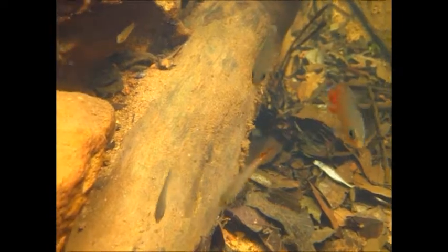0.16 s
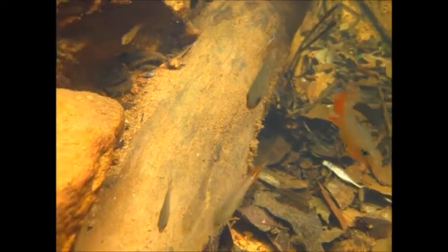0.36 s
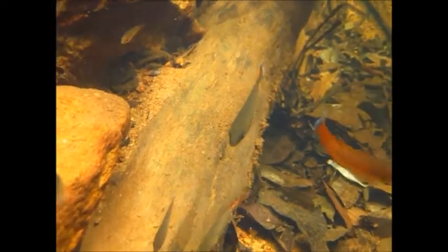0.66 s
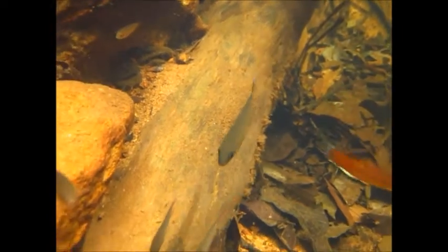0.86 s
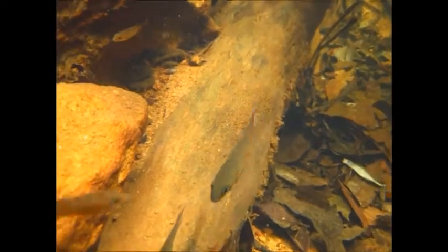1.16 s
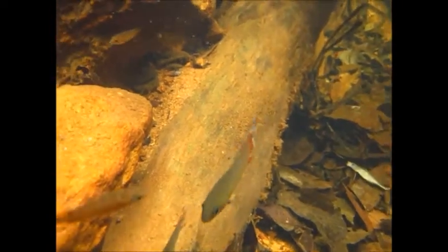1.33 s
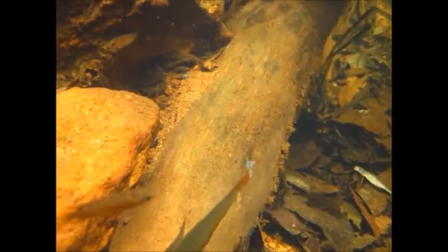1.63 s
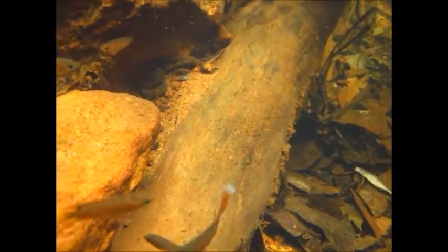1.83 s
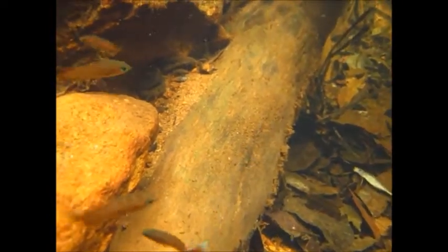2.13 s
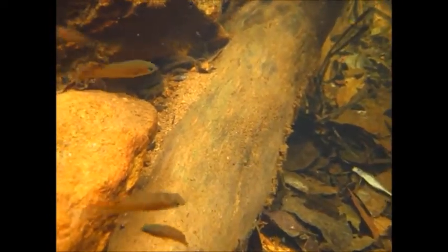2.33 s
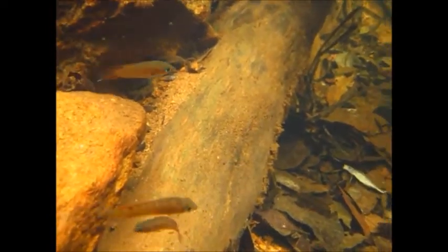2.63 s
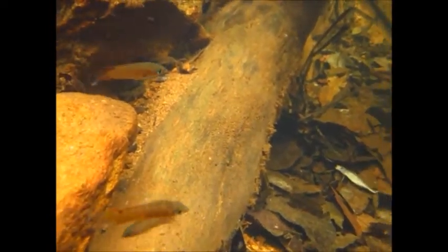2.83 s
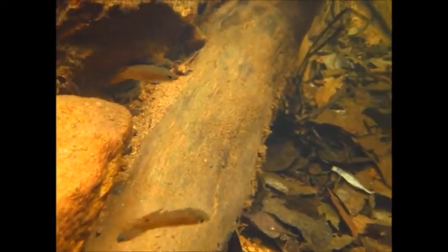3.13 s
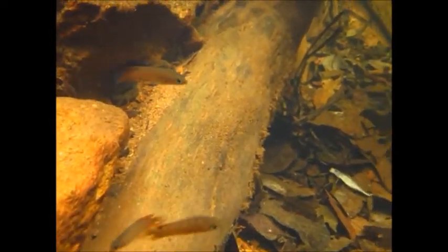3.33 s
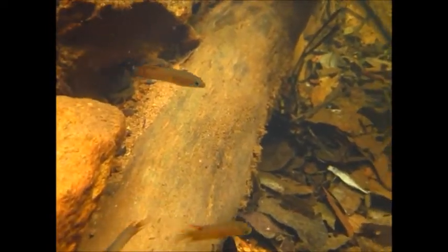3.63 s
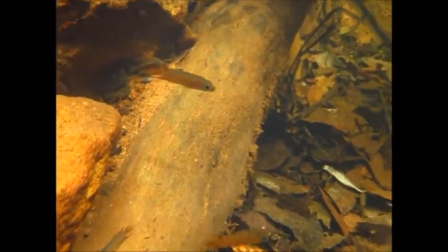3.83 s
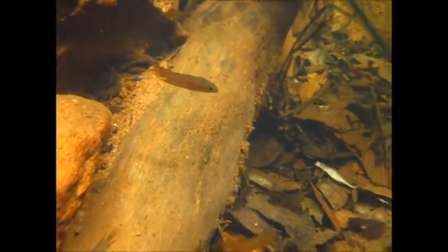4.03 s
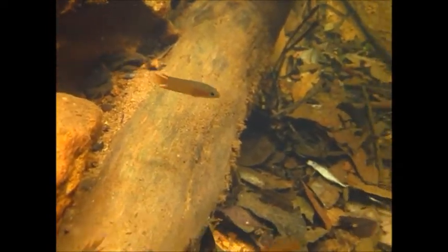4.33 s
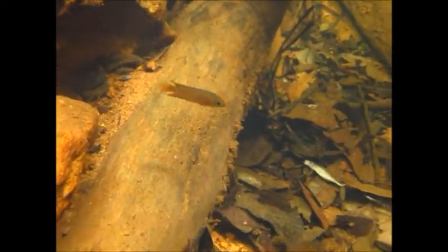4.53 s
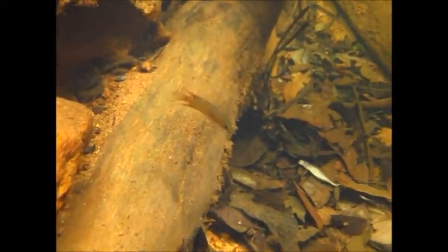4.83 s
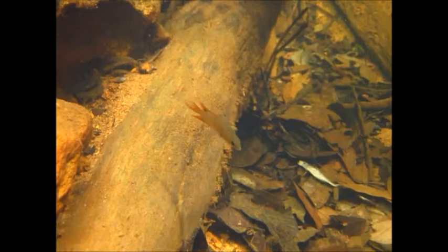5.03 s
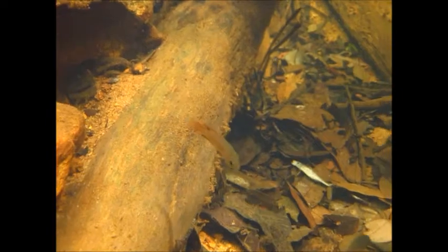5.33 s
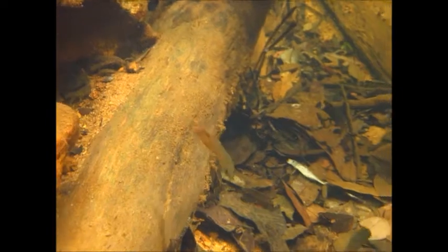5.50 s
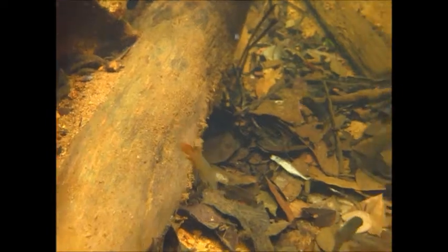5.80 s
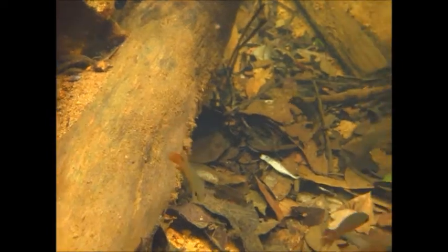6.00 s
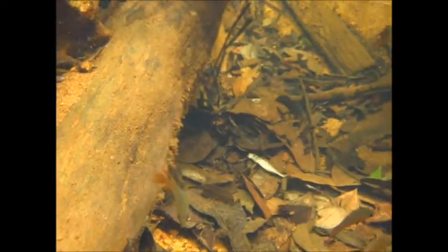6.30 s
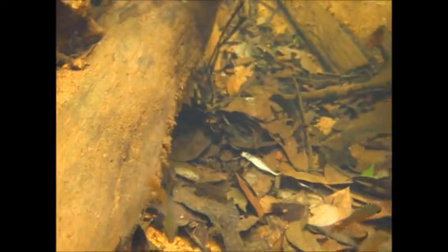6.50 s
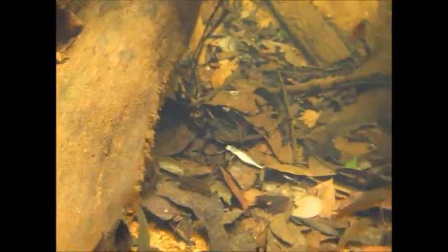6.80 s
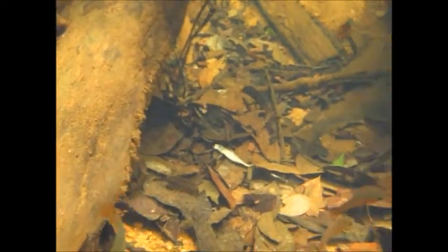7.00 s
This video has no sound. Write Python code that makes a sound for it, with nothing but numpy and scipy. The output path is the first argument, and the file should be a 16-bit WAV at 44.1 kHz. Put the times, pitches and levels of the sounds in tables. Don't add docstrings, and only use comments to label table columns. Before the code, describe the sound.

Underwater current rumbles and hums around a small sealed housing, with dull thuds, watery plops, snaps, a few grit ticks and thin steady whine.

```python
import sys
import numpy as np
from scipy import signal
from scipy.fft import rfft, irfft, next_fast_len
from scipy.io import wavfile
from scipy.ndimage import uniform_filter1d, map_coordinates

SR = 44100
rng = np.random.default_rng(int(sys.argv[2]) if len(sys.argv) > 2 else 0)


def master_out(mix):
    frames = np.transpose(np.atleast_2d(mix))
    ceiling = np.clip(frames, -1, 1)
    pcm = np.round(ceiling * 32767).astype(np.int16)
    wavfile.write(sys.argv[1], SR, pcm)


def volts_from_db(level):
    exponent = np.asarray(level, float) / 20
    return 10 ** exponent


N = 315315
CAVITY_HZ, CAVITY_T60_S = 577, 0.045


def unit(x):
    return x / np.sqrt(np.mean(x ** 2) + 1e-20)


def filtered(x, response):
    m = next_fast_len(N + 8192)
    return irfft(rfft(x, m) * response(np.fft.rfftfreq(m, 1 / SR)), m)[:N]


def shape(points):
    f, db = np.transpose(points)
    return lambda hz: volts_from_db(np.interp(np.log(hz + 1), np.log(f + 1), db))


def modes(table):
    def response(f):
        total = 0
        for k, (center, width, db) in enumerate(table):
            peak = 1j * f * width / (center * center - f * f + 1j * f * width)
            total = total + (-1) ** k * volts_from_db(db) * peak
        return total
    return response


def wobble(rate):
    knots = rng.standard_normal(int(N * 40 / SR) + 4)
    return map_coordinates(knots, [np.arange(N) * min(rate, 40) / SR])


def patchy(depth_db):
    z = signal.stft(rng.standard_normal(N + 512), nperseg=512)[2]
    field = uniform_filter1d(rng.standard_normal(z.shape), size=4, axis=0)
    field = uniform_filter1d(field, size=6, axis=1)
    return signal.istft(z * volts_from_db(depth_db * unit(field)), nperseg=512)[1][:N]


def rings(s, db, hz, t60, phase, rise, size):
    t = np.arange(size) / SR
    lead = np.round((np.asarray(s) - .5 * rise / hz) * SR).astype(int).clip(0)
    hz, t60, db, phase = (np.reshape(v, (-1, 1)) for v in (hz, t60, db, phase))
    late = t - .5 * rise / hz
    decay = volts_from_db(db - 60 * late / t60)
    start = 1 - np.exp(-(hz * t / rise) ** 2)
    waves = decay * start * np.cos(2 * np.pi * hz * late + phase)
    places = lead[:, None] + np.arange(size)
    return np.bincount(places.ravel(), waves.ravel(), N + size + SR)[:N]


def outward(way):
    return np.pi * (np.asarray(way) < 0)


def soft_ring(s, db, hz, t60, way):
    return rings(s, db, hz, t60, 3.31 + outward(way), rise=0.7, size=2600)


def swarm(count, spread_db, hz, octaves, cycles, size):
    u, g = rng.random((count, 3)), rng.standard_normal(count)
    pitch = hz * 2 ** (octaves * np.clip(g, -2, 2))
    db = np.minimum(-spread_db * np.log(u[:, 1]), 11)
    return unit(rings(u[:, 0] * N / SR, db, pitch, cycles / pitch, 2 * np.pi * u[:, 2], 0.71, size))


# t/s, level/dB
CURRENT_STRENGTH = [
    (0.0, 3),
    (2.63, 0.3),
    (6.35, 0.05),
    (6.69, 2),
    (7.15, .6),
]


def current():
    flow_db = np.interp(np.arange(N) / SR, *np.transpose(CURRENT_STRENGTH))
    surge = wobble(17)
    hollow_db = -37.5 + 0.57 * flow_db + 0.081 * surge + 2.3 * wobble(30)
    rush_db = -43 + 0.31 * flow_db + 0.45 * surge
    buffet_db = -40 + 2.23 * flow_db
    return volts_from_db(hollow_db) * hollow_air() + volts_from_db(rush_db) * rush() + volts_from_db(buffet_db) * buffeting()


# f/Hz, width/Hz, level/dB
AIR_MODES = [(434.4, 51.4, 3), (563.7, 43, -0.5)]


def hollow_air():
    return unit(filtered(filtered(patchy(0.16), modes(AIR_MODES)), modes([(530, 1700, 0)])))


# f/Hz, width/Hz, level/dB
WALL_MODES = [(676, 110, -1.5), (968.5, 20.6, 2.5), (1200, 62, -7.5), (1501, 45, -3), (1937, 56, -2.5),
              (4600, 450, -23)]
# f/Hz, level/dB (per Hz)
WASH_SPECTRUM = [(180, -52), (300, -5.5), (442, -15.5), (962, -9), (1280, -16), (1530, -8.5), (1780, -16.5),
                 (4610, -38), (6000, -40), (7800, -83), (13200, -120)]


def rush():
    walls = unit(filtered(patchy(1.7), modes(WALL_MODES)))
    wash = unit(filtered(patchy(2.2), shape(WASH_SPECTRUM)))
    bubbles = swarm(count=700, spread_db=0.5, hz=880, octaves=0.612, cycles=19.5, size=900)
    return volts_from_db(-2.5) * walls + volts_from_db(-2.5) * wash + volts_from_db(-5.5) * bubbles


# f/Hz, level/dB (per Hz)
BUFFET_SPECTRUM = [(8.8, -11), (15, 3.5), (55, 0.5), (85, -7), (145, -13.5), (201, -7.5), (400, -8.5),
                   (520, -38), (880, -120)]


def buffeting():
    rumble = unit(filtered(patchy(0.32), shape(BUFFET_SPECTRUM)))
    eddies = swarm(count=600, spread_db=-5.5, hz=100.0, octaves=0.98, cycles=2.44, size=2200)
    return unit(rumble + 1.3 * eddies)


# t/s, level/dB, f/Hz, direction (+1 in, -1 out)
SURGE_EVENTS = [(0.782, -18, 57, 1), (0.996, 0.5, 49, -1), (1.099, -12, 52, -1), (1.151, -22, 77, 1),
                (1.24, -9, 93, 1), (1.297, -15, 82, -1), (1.47, -16, 74, 1), (2.306, -4.5, 80, 1),
                (2.652, -9, 74, 1), (2.666, -4, 61, -1), (2.695, -7, 86, -1), (2.787, 5, 74, -1),
                (2.83, -19, 30, -1), (3.059, -4.5, 56, 1), (3.459, -8, 61, -1), (3.551, 0, 52, -1),
                (3.948, 0.5, 57, 1), (3.974, -5, 93, 1), (3.984, -10, 64, -1), (4.348, -8, 68, -1),
                (4.381, -7, 83, 1), (4.717, -5.5, 66, 1), (4.83, -7.5, 78.5, 1), (5.161, -22, 90, -1),
                (5.267, -10, 77, -1), (5.626, -12, 65, 1), (5.668, -1.5, 102, 1), (5.863, -7.5, 62, -1),
                (6.38, -10, 56.5, 1), (6.713, -18, 79, 1), (.793, -11, 66, -1), (.147, -8, 73, -1),
                (1.151, -11, 68, 1), (3.486, -10, 73, -1), (4.039, -12, 64, -1), (5.463, -1, 76, 1)]


def surges():
    s, db, hz, way = np.transpose(SURGE_EVENTS)
    return rings(s, db, hz, 0.75 / hz, -0.75 + outward(way), rise=0.64, size=2600)


# t/s, level/dB, f/Hz, time to fall 60 dB/s
PUSH_EVENTS = [(.1422, -9, 215, 0.023), (.993, -8.5, 170, 0.011), (.239, -13, 130, .012),
               (.366, -15, 92, 0.026), (.559, -11, 154, .01), (2.692, 0, 178, 0.0057),
               (.602, -16, 114, 0.038), (1.15, -9, 212, 0.013), (1.188, -9, 130, .009),
               (1.259, -5, 134, 0.022), (1.395, -9, 79, 0.034), (1.4735, 5.5, 181, 0.0033),
               (1.136, -18, 200, .012), (3.48, -13, 110, .015), (4.046, -16, 150, .015),
               (2.544, -9, 128, 0.016), (2.731, -10, 154, .0092), (2.777, -8, 167, 0.039),
               (2.783, -3, 110, 0.0062), (1.0105, -12, 120, 0.0095), (2.806, -12, 130, 0.016),
               (3.0215, -7.5, 170, 0.019), (3.315, -11.5, 131, 0.016), (3.364, -11, 95, 0.032),
               (3.546, -10, 248, 0.027), (3.919, -6, 187, .016), (4.03, -11, 182, 0.011),
               (4.343, -15, 154, .0086), (4.887, -10.5, 159, 0.01), (5.3873, 7, 111, 0.0029),
               (5.483, -12, 77, 0.05), (6.535, -7, 130, 0.023), (6.615, -6.5, 130, 0.02),
               (6.696, -5.5, 120, 0.041), (6.732, -3, 110, 0.0051), (6.747, 0.5, 154, 0.0046),
               (.473, -16, 186, .02), (.51, -16, 200, .02), (.718, -20, 171, .025), (6.824, -19, 143, .025),
               (1.056, -16, 208, .02)]
# t/s, level/dB, f/Hz, time to fall 60 dB/s
PULL_EVENTS = [(1.0262, -1, 110, 0.0048), (1.298, -20, 290, 0.04), (1.507, -17, 302, 0.016),
               (1.662, -6, 255, 0.0048), (1.93, -10, 173, 0.014), (2.829, -18.5, 216, 0.036),
               (2.952, -8, 154, 0.007), (4.4845, -2.5, 111, 0.027), (5.4593, 2.5, 130, 0.0049),
               (5.408, -12, 200, .008), (2.656, -13, 176, .015), (1.078, -10, 183, 0.011),
               (6.55, -14, 110, 0.028), (6.654, -10, 154, 0.0066), (6.669, -7, 182, 0.0094),
               (6.851, -11, 154, 0.011), (6.88, -18, 154, 0.033), (6.984, -17, 155, 0.022),
               (7.053, -11.5, 155, 0.0086), (.073, -18, 216, .02), (1.217, -20, 168, .025),
               (2.367, -18, 157, .025), (3.72, -18, 177, .025)]


def thumps():
    sound = np.zeros(N)
    for table, way in ((PUSH_EVENTS, 1), (PULL_EVENTS, -1)):
        s, db, hz, t60 = np.transpose(table)
        sound += rings(s, db - 4.0, hz, t60, -1.02 + outward(way), rise=0.13, size=2600)
    return sound


# t/s, ring level/dB, thump level/dB
GULP_EVENTS = [
    (1.825, -8.5, -4.5),
    (5.1597, -4.5, -0.5),
    (6.21, -5, -10.5),
]


def gulps():
    s, ring_db, thump_db = np.transpose(GULP_EVENTS)
    hz = np.full(len(s), CAVITY_HZ)
    ring = rings(s - .5 / hz, ring_db, hz, CAVITY_T60_S, 0, rise=.8, size=2600)
    kick = rings(s - .0003, ring_db + 4, hz * 0 + 440, 0.0057, np.pi - .75, rise=.3, size=900)
    swing = rings(s, thump_db, hz * 0 + 127, 0.02, -2, rise=.15, size=2600)
    return filtered(ring + kick + swing, lambda f: 1 / (1 + (f / 760) ** 6))


# t/s, level/dB, f/Hz, direction (+1 in, -1 out)
PLOP_EVENTS = [(.043, -20, 582, 1), (.055, -22.5, 600, 1), (0.064, -21, 500, 1), (.106, -24, 550, 1),
               (.993, -10.5, 720, 1), (.9997, -16, 740, 1), (2.658, -21, 547, 1), (3.026, -19, 453, 1),
               (6.704, -27, 795, 1), (.185, -18, 820, 1), (.1985, -15, 980, -1), (0.212, -24, 1050, -1),
               (1.281, -19, 545, 1), (.364, -19, 565, 1), (.602, -21, 583, 1), (1.011, -23, 473, 1),
               (1.045, -12, 580, 1), (1.046, -14.5, 884, 1), (1.059, -11, 342, -1), (1.474, -22, 363, 1),
               (1.072, -18, 496, 1), (1.082, -18, 477, 1), (2.224, -19, 476, 1), (2.297, -20.5, 600, 1),
               (2.667, -24, 470, 1), (2.777, -18, 385, 1), (4.104, -16, 565, 1), (3.762, -20.5, 536, 1),
               (5.3866, -21, 554, 1), (5.679, -20, 580, 1), (6.669, -17.5, 616, -1), (6.696, -13.5, 440, 1),
               (6.715, -16, 566, 1), (6.821, -20.5, 520, 1), (6.852, -16, 560, -1), (.06, -24, 355, 1),
               (.449, -25, 330, -1), (4.215, -26, 346, 1), (6.627, -25, 384, -1), (5.323, -22, 480, 1),
               (5.646, -21, 483, 1), (3.708, -22, 480, 1), (3.732, -24, 450, 1), (2.755, -25, 560, 1),
               (3.983, -23, 483, 1), (1.19, -24, 487, 1)]


def plops():
    s, db, hz, way = np.transpose(PLOP_EVENTS)
    near = np.exp(-(np.log2(hz / CAVITY_HZ) / 0.29) ** 2)
    off_t60_s = 0.036
    return soft_ring(s, db, hz, off_t60_s + (CAVITY_T60_S - off_t60_s) * near, way)


# t/s, upper note level/dB, upper note f/Hz, lower note level/dB
KNOCK_EVENTS = [(.043, -22, 1204, -44), (.055, -32, 1440, -40), (.56, -27, 1200, -35),
                (3.025, -29, 1530, -40), (6.535, -29, 1340, -40), (6.747, -30, 1500, -40),
                (6.895, -31, 1250, -40), (0.988, -15, 1200, -32), (1.244, -30, 1300, -35),
                (1.317, -30, 1130, -40), (.143, -30, 1270, -25), (.453, -20.5, 1220, -19),
                (.537, -27, 1210, -25), (.94, -26.5, 1240, -30), (0.9924, -11, 1200, -40),
                (1.0445, -19, 1200, -40), (1.012, -26, 1240, -19), (1.037, -33, 1280, -40),
                (1.077, -22, 1220, -23), (1.088, -23, 1220, -23), (1.152, -29, 1335, -20.5),
                (1.258, -25, 1270, -42), (1.28, -23, 1170, -36), (1.306, -30, 1250, -25),
                (1.473, -22, 1270, -22), (.476, -40, 1310, -24), (4.031, -31, 1430, -45),
                (.365, -33, 1270, -45), (6.636, -45, 1370, -32), (2.663, -26, 1410, -40),
                (2.692, -20.5, 1420, -33), (2.7835, -16, 1465, -23.5), (2.777, -12.5, 1270, -17.5),
                (3.011, -28, 1320, -37), (3.014, -26, 1360, -40), (3.546, -21, 1425, -40),
                (3.919, -26, 1510, -30), (4.344, -26.5, 1490, -29), (4.4825, -42, 1216, -23.5),
                (6.548, -25, 1430, -29), (6.615, -22.5, 1310, -35), (6.696, -19, 1500, -27),
                (4.888, -33, 1460, -37), (1.0585, -17, 1200, -40), (3.762, -30, 1230, -40),
                (4.102, -30, 1330, -45), (5.58, -32, 1300, -45), (6.775, -31, 1260, -45),
                (2.763, -36, 1350, -30), (6.972, -38, 1400, -30), (3.029, -38, 1380, -31)]


def knocks():
    s, db, hz, lower_db = np.transpose(KNOCK_EVENTS)
    lower_hz = 724 * (hz / 1270) ** 0.87
    return soft_ring(s, db, hz, 0.023, 1) + soft_ring(s, lower_db, lower_hz, 0.046, 1)


# t/s, level/dB, f/Hz, direction (+1 in, -1 out)
SNAP_EVENTS = [(.1898, 3.5, 880, -1), (.1903, -1, 380, -1), (.21, -12, 559, 1), (.19545, 0, 560, 1),
               (.19685, 7.5, 1180, -1), (0.2091, -1, 1050, -1), (1.461, -13, 350, 1), (1.4731, -17, 750, 1),
               (1.4722, -10, 380, 1), (1.0587, -6, 3950, 1), (1.3013, -10, 400, -1), (1.4, -14, 335, 1),
               (1.5095, -13, 400, 1), (4.4833, -9.5, 280, 1), (4.4812, -4.5, 476, 1),
               (2.7775, -24, 2000, 1), (0.4746, -13, 1100, 1), (.4738, -9, 400, 1), (0.5135, -10, 640, -1),
               (0.514, -8, 1350, -1), (0.993, -10, 425, 1), (1.063, -5, 624, 1), (1.0589, 0, 820, -1),
               (1.088, -20, 2030, 1), (1.28, -17, 1930, 1), (3.762, -17, 900, -1), (3.755, -20, 900, -1),
               (1.078, -5, 460, -1), (1.2436, -13, 534, 1), (1.28, -9, 480, 1), (1.659, -21, 766, -1),
               (1.933, -16.5, 825, -1), (2.225, -11.5, 1280, 1), (2.6546, -5, 794, 1),
               (2.6541, -9.5, 337, 1), (1.011, -8.5, 200, 1), (2.951, -17.5, 880, -1), (3.012, -16, 377, 1),
               (3.551, -19, 470, -1), (3.762, -15.5, 263, -1), (5.321, -15, 1270, 1),
               (5.516, -15.5, 1300, 1), (6.545, -16, 355, 1), (6.987, -10, 530, 1)]


def snaps():
    s, db, hz, way = np.transpose(SNAP_EVENTS)
    return soft_ring(s, db, hz, 4.73 / hz, way)


# t/s, level/dB, then level/dB of the upper, edge and top notes
TICK_EVENTS = [(.142, -37, -15, -20, -16), (3.96, -52, 9, 2, 0), (0.19685, -3, 1, -15, -2),
               (1.075, -50, 10, 0, -10), (1.0785, -45, 10, 0, -10), (1.083, -50, 10, 0, -10),
               (1.113, -51, 10, 0, -10), (3.967, -50, 10, 0, -5), (5.16, -48, 8, 0, -8),
               (0.2097, -16, -6, -17, -22), (0.474, -36, -16, -25, -16), (0.5128, -32.5, -18, -25, -18),
               (0.989, -30, -7, -15, -8), (1.0587, -11.5, -6, -6, -15), (1.062, -23, -13, -14, -20),
               (2.2254, -46, 11, -11, 8), (2.297, -43.5, 13, 11.5, 7), (2.654, -45, 5, -10, -10),
               (2.692, -41, -8, -20, -14), (2.7776, -38, -3, -10, -14), (2.7836, -48, -3, -14, -14),
               (6.5178, -43, 8, -6, 0)]
# f/Hz, level/dB, time to fall 60 dB/s
SHELL_MODES = [
    [(2540, -10, 0.014), (2880, -0.5, 0.0065)],
    [(4630, 1.5, 0.0049)],
    [(5520, 4.5, 0.0031), (6620, -3, 0.0029)],
    [(8800, -12, 0.0018), (10900, -18, .0018), (13500, -30, 0.0019)],
]


def ticks():
    s, db, upper_db, edge_db, top_db = np.transpose(TICK_EVENTS)
    sound = np.zeros(N)
    for group, share_db in zip(SHELL_MODES, (0, upper_db, edge_db, top_db)):
        for hz, level, t60 in group:
            pitch = hz * (1 + .015 * rng.standard_normal(len(s)))
            sound += rings(s, db + share_db + level, pitch, np.full(len(s), t60), np.pi, rise=0.73, size=500)
    return sound


# middle t/s, length/s, level/dB,
# share above the upper note level/dB
SCRAPE_EVENTS = [
    (0.188, .004, -46, -8),
    (.1915, .006, -38, -4.5),
    (.1935, 0.003, -30, -20),
    (0.203, .006, -43, -25),
    (1.061, 0.004, -36, -25),
    (1.081, .008, -47, -18),
]


def scrapes():
    t = np.arange(N) / SR
    low = unit(filtered(rng.standard_normal(N), modes([(2620, 1200, -8), (4630, 700, -4)])))
    top_shape = shape([(5500, -40), (7000, 4), (12000, -12), (13500, -35)])
    top = unit(filtered(rng.standard_normal(N), top_shape))
    sound = np.zeros(N)
    for s, length, db, top_db in SCRAPE_EVENTS:
        swell = np.exp(-(2 * (t - s) / length) ** 2)
        sound += volts_from_db(db) * swell * (low + volts_from_db(top_db) * top)
    return sound


WHINE_SLIPS = [
    1.79,
    3.596,
    6.32,
]


def whine():
    t = np.arange(N) / SR
    field_s, retrace_s = 1 / 59.94, .00052
    frames = (t - .01773) / (2 * field_s)
    since = frames % 1 * 2 * field_s
    in_gap = np.abs(since - field_s - retrace_s / 2) < retrace_s / 2
    sign = (1 - 2 * (np.floor(frames) % 2)) * np.where(in_gap, -1, 1)
    sign = sign * (1 - .4 * np.exp(-((since - retrace_s) / 0.00029) ** 2))
    unlock = sum(np.exp(-((t - s) / .011) ** 4) for s in WHINE_SLIPS)
    jitter = 2.2 * unlock * unit(filtered(rng.standard_normal(N), lambda hz: hz < 200))
    scan = sign * np.sin(2 * np.pi * 7867.13 * t + jitter)
    scan = filtered(scan, lambda hz: np.exp(-((hz - 8200) / 1700) ** 2))
    return volts_from_db(-52.0) * scan + volts_from_db(-65.5) * np.sin(2 * np.pi * 12600 * t)


# f/Hz, level/dB (per Hz)
HISS_SPECTRUM = [(1000, 9), (3000, 1.5), (5000, -1.5), (8500, -3), (12000, -5.5), (14000, -7.5),
                 (15700, -10)]


def hiss():
    return volts_from_db(-54.0) * unit(filtered(rng.standard_normal(N), shape(HISS_SPECTRUM)))


# t/s, lost above f/Hz, share lost (0-1)
TREBLE_GAPS = [
    (.118, 2200, .95),
    (.243, 2300, .82),
    (.393, 2400, .87),
    (.692, 2300, .85),
    (5.836, 3400, .97),
    (6.067, 2300, .8),
    (6.175, 2500, .85),
    (6.838, 2800, .95),
]


def treble_dropouts(x):
    t = np.arange(N) / SR
    band_hz = 300 * np.arange(80)
    lost = np.zeros(N)
    for s, low_hz, share in TREBLE_GAPS:
        chance = np.where(band_hz < 5500, .85, .97)
        dropped = (band_hz > low_hz - 300) & (rng.random(80) < chance)
        around = x * np.exp(-((t - s) / .03) ** 4)
        treble = filtered(around, lambda hz: dropped[(hz // 300).astype(int)])
        lost += share * treble * np.exp(-((t - s) / .0095) ** 4)
    return x - lost


def scene():
    water = current() + surges() + thumps() + gulps()
    housing = plops() + knocks() + snaps()
    return (water + housing + ticks() + scrapes())[None]


def low_pass(x):
    return signal.sosfilt(signal.butter(12, 16810, fs=SR, output="sos"), x)


def record(dry):
    preamp = lambda hz: 1j * hz / (12 + 1j * hz) * (hz < 15800)
    converter = lambda hz: np.abs(hz - 6300) / np.hypot(hz - 6300, 1300)
    clipped = np.clip(filtered(dry[0] + hiss(), preamp), -.97, .97)
    mix = treble_dropouts(filtered(clipped, converter)) + filtered(whine(), converter)
    return low_pass(mix[None])


dry = scene()
out = record(dry)
master_out(out)
```